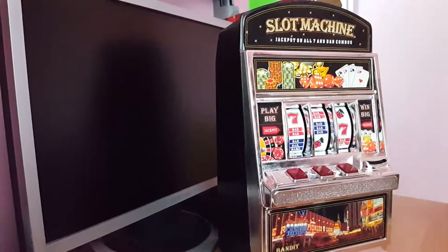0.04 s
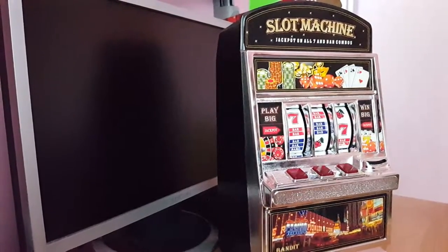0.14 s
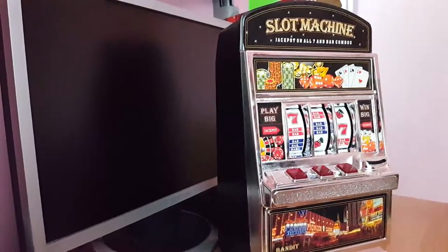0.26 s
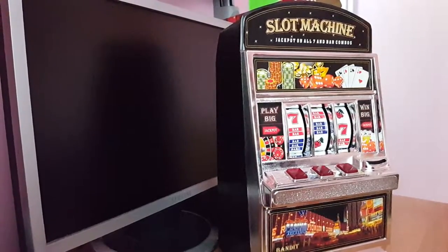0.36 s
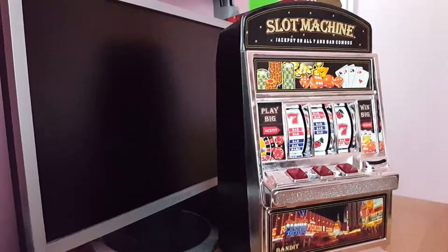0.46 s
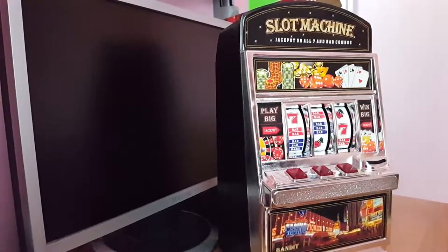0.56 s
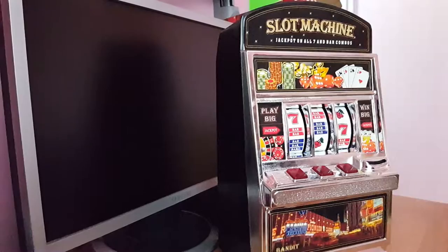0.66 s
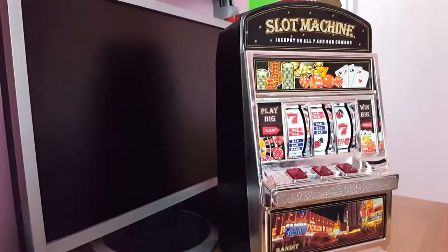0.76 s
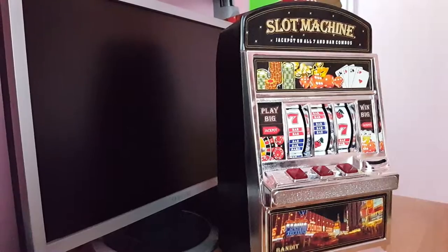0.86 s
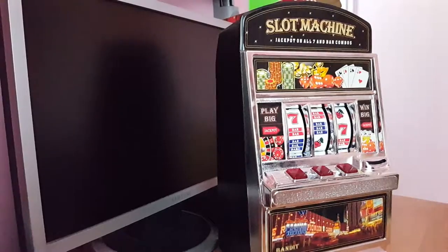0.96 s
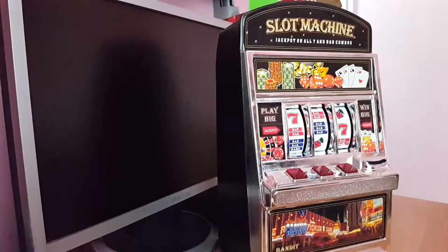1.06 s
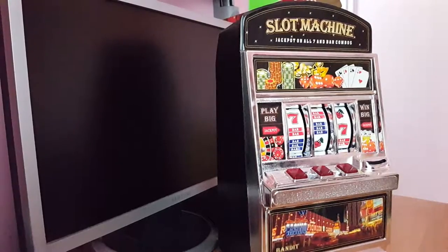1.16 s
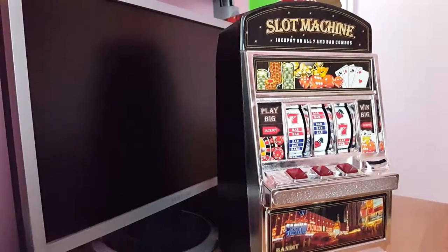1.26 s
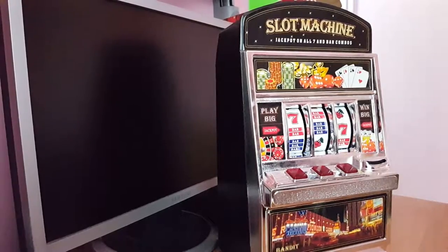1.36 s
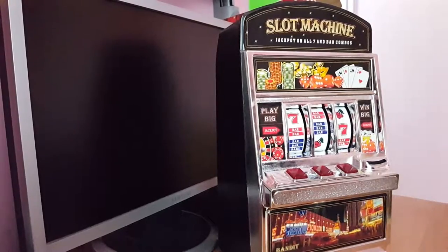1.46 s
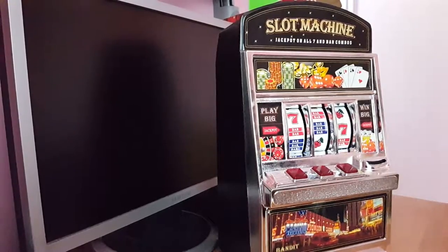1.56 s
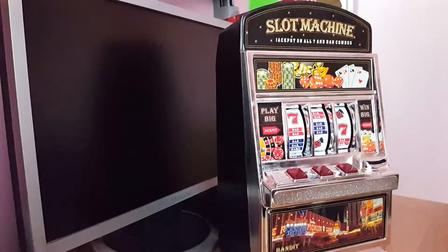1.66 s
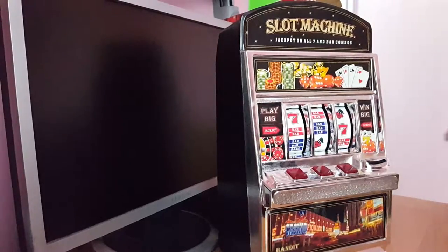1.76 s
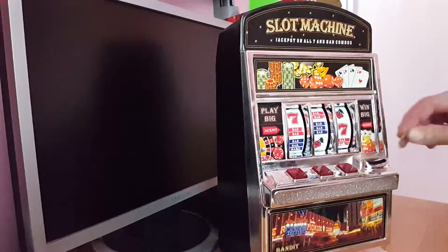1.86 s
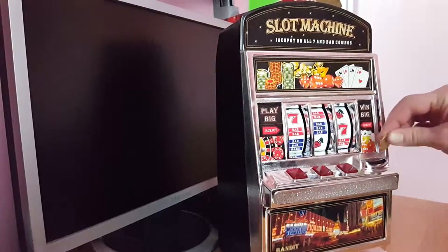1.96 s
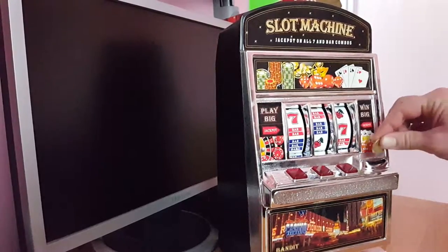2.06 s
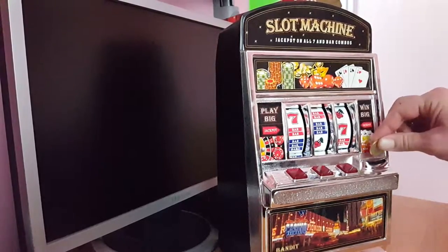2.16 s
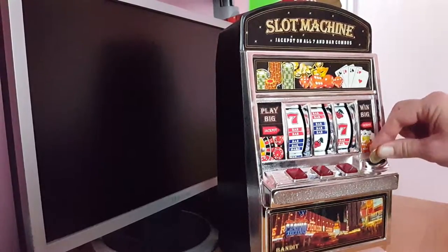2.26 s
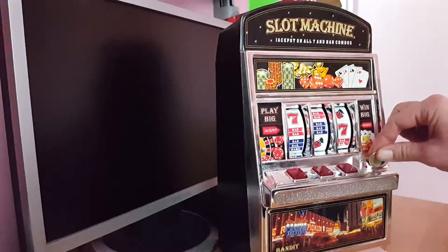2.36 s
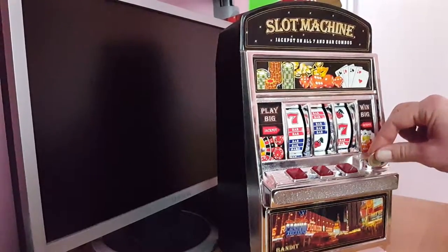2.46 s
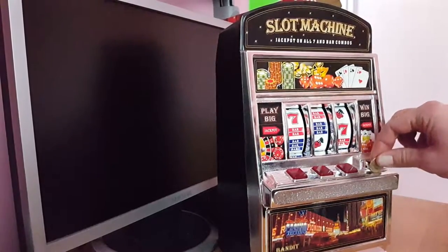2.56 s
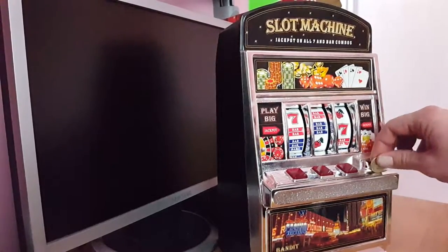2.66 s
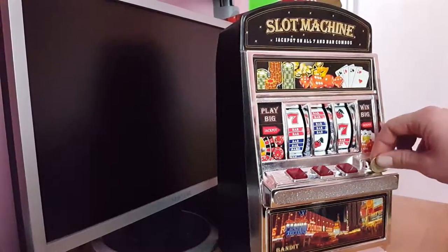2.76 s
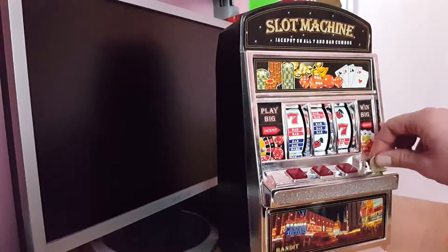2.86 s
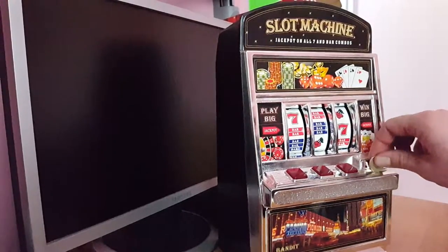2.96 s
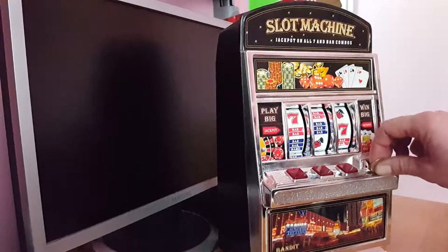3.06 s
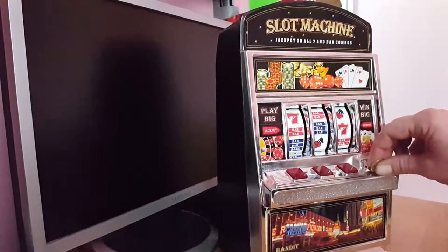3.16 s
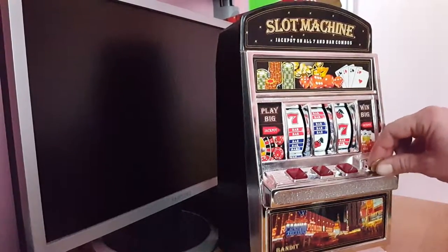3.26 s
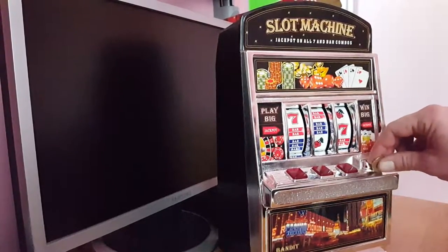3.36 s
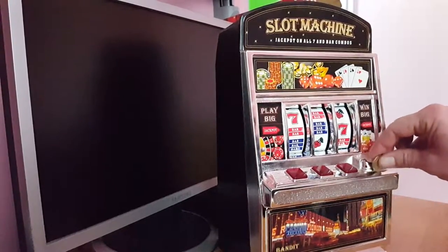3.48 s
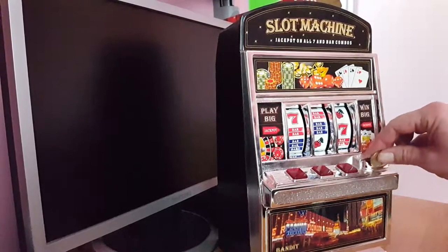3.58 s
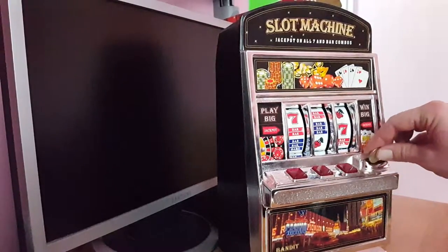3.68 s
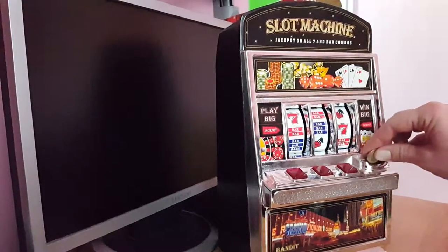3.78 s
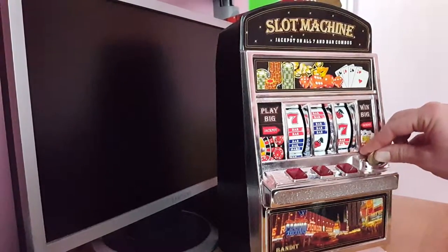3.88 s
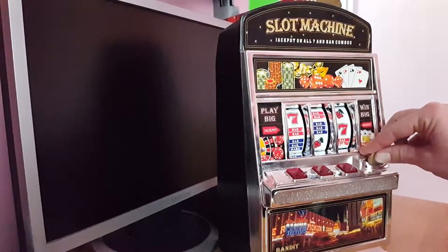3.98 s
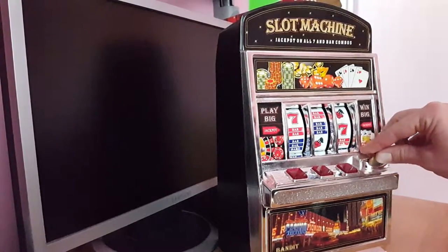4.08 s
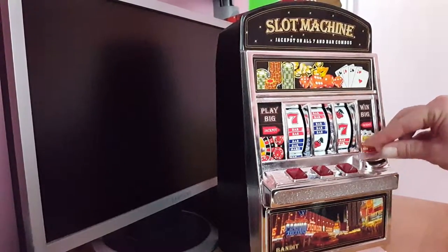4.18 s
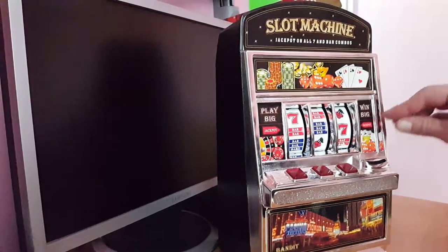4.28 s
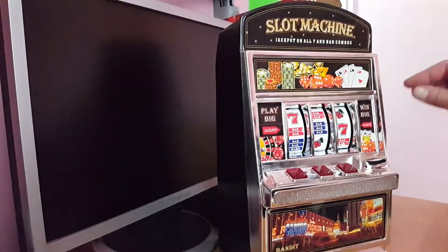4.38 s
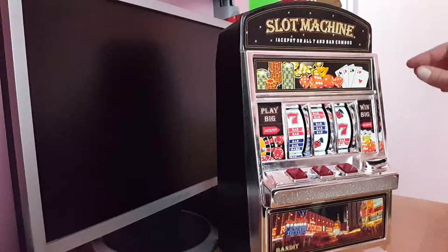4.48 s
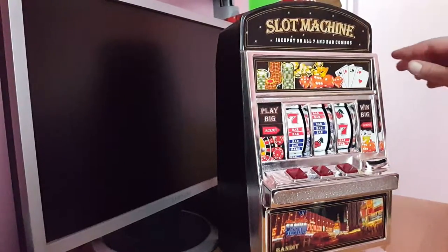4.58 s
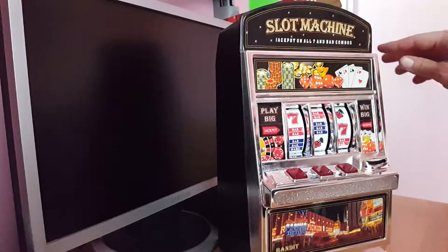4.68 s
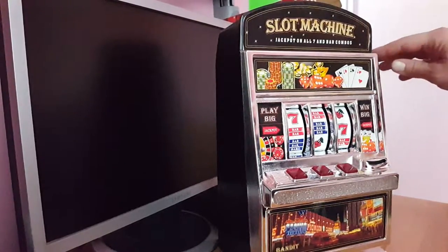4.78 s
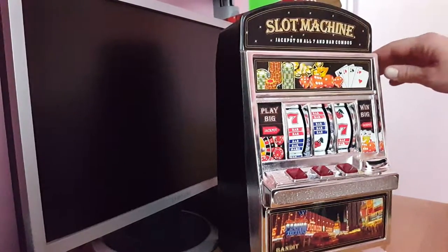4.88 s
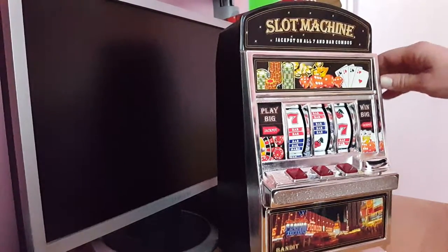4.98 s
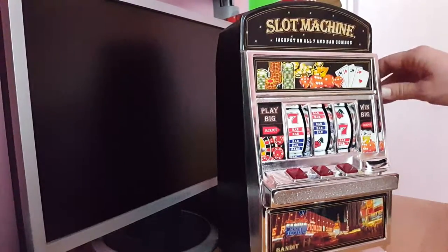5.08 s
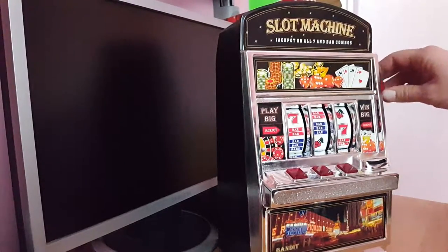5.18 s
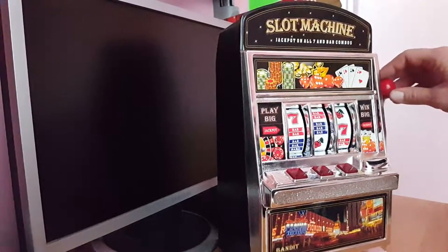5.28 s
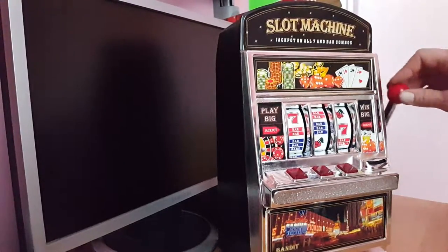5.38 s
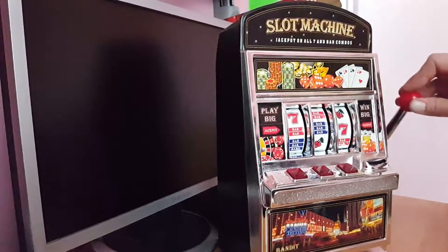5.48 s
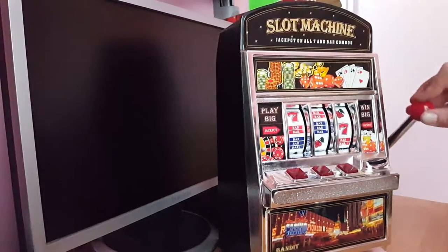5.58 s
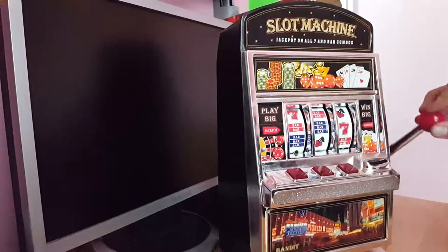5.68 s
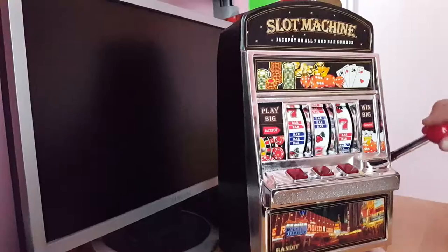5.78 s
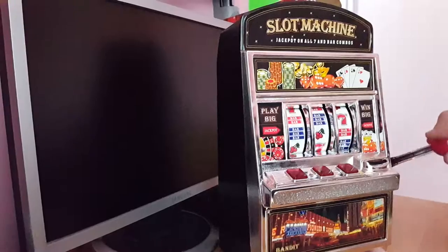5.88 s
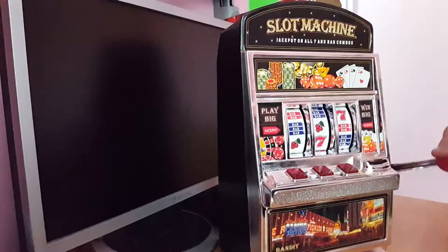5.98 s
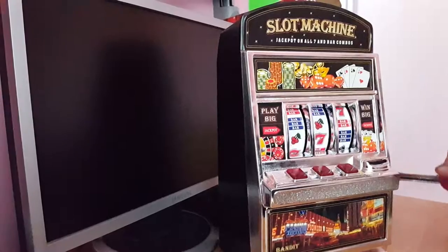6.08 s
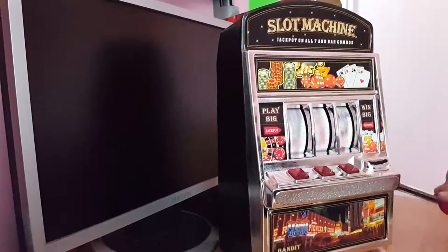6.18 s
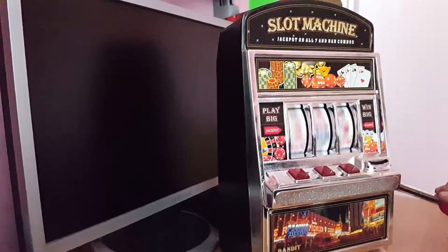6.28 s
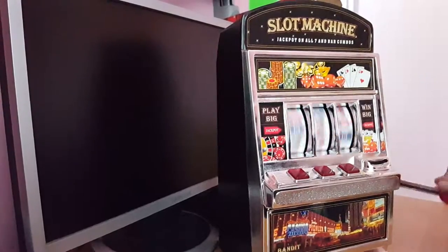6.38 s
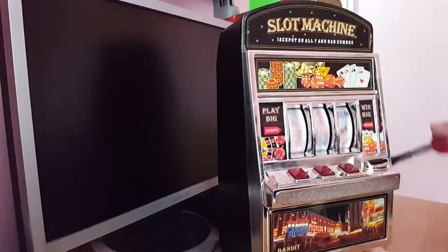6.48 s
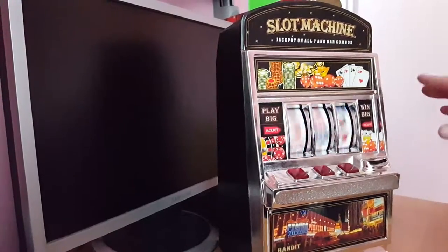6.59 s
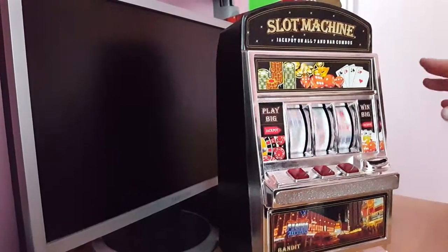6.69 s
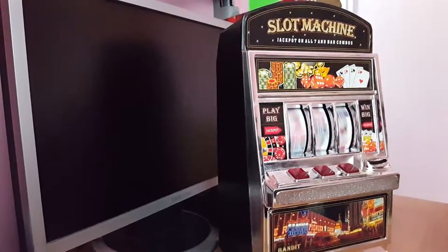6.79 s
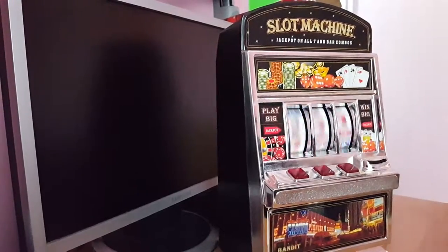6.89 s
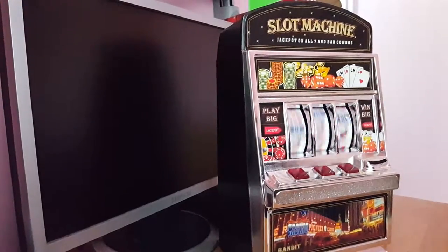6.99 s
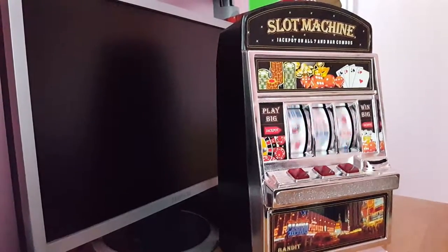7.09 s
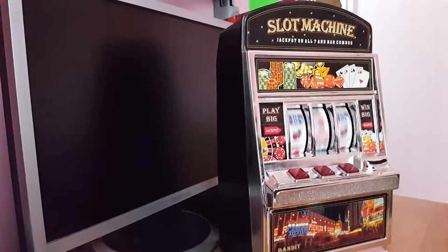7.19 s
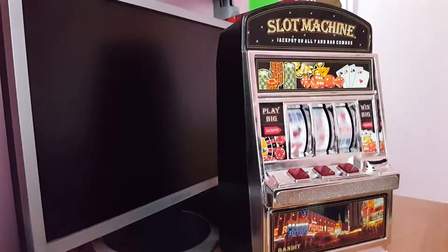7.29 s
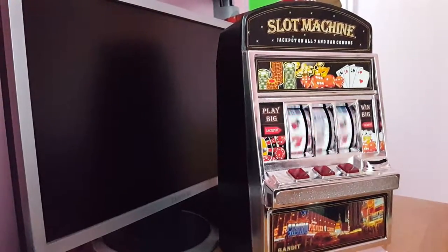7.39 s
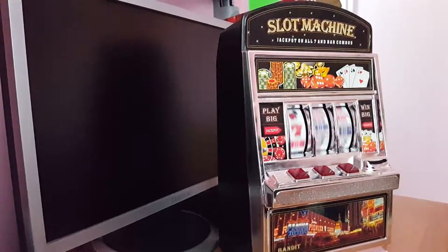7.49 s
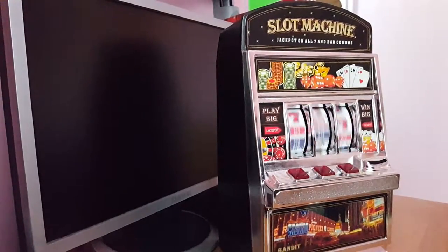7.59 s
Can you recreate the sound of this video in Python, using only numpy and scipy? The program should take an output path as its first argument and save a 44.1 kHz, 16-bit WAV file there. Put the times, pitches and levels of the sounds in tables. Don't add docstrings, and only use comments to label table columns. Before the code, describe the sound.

Close, dry stereo sound of a small plastic toy gambling machine on a desk. First a click, soft touches and one tiny glass clink over faint room hum. A coin knocks around its slot, drops and bounces in a rapid hollow rattle. The lever grinds against its ratchet and snaps back hard; hollow reels whirr, then burst into loud metallic clacking and ease off while still turning.

```python
import sys
import numpy as np
from scipy import signal
from scipy.fft import rfft, irfft, next_fast_len
from scipy.io import wavfile
from scipy.ndimage import uniform_filter1d

SR = 44100
rng = np.random.default_rng(int(sys.argv[2]) if len(sys.argv) > 2 else 0)


def gain_from_db(level_db):
    decades = np.asarray(level_db, float) / 20
    return 10 ** decades


def store_pcm(level_fs):
    pcm = np.round(np.clip(level_fs, -1, 1) * 32767).astype(np.int16)
    wavfile.write(sys.argv[1], SR, np.atleast_2d(pcm).T)


N = 336924

# t/s, force/dB, thud/dB, contact/ms, edge/dB
SLOT_TAPS = [(2.383, -22, -4, 4.7, 4), (2.603, -21, -1.5, 4.7, 1), (2.665, -49.5, -5.5, 6, 3),
             (2.852, -30, -3.5, 5, -4.5), (2.925, -58.5, 12, 8, 0), (3.048, -51.5, 8.5, 17, 0),
             (3.083, -60.5, 13, 8.9, 0), (3.155, -68, 18, 8, 0), (3.19, -68, 18, 6.5, 0),
             (3.316, -54, -9, 6.7, 13), (3.439, -53.5, 13.5, 10, 0), (3.555, -21, -11.5, 6.3, -4),
             (3.608, -24.5, -13.5, 3.9, 0), (4.073, -42, -3.5, 10, -5), (4.12, -32.5, -5, 22, -0.5),
             (5.038, -57.5, 17, 6, 0), (5.247, -40.5, -27, 9.7, 5.5), (5.289, -40.5, 4, 4.5, 3),
             (5.402, -47, 3, 6, 8), (5.449, -54, 3, 9, 18)]
# t/s, force/dB, thud/dB, contact/ms
COIN_BOUNCES = [(4.173, -9.5, -9.5, 8.8), (4.187, -21, 2, 6), (4.217, -14.5, -8.5, 13),
                (4.27, -10, -6, 3.5), (4.287, -12.5, -1, 3.5), (4.298, -18.5, -2.5, 6.4),
                (4.323, -8.5, -20, 9), (4.382, -17, -27.5, 9.9), (4.403, -14, -16, 5.1),
                (4.433, -20, -16, 7.3), (4.457, -12.5, -4, 3.4), (4.487, -15, -17, 11),
                (4.505, -21.5, -1.5, 5.7), (4.526, -42, 4.5, 23), (4.557, -24, -25.5, 10),
                (4.585, -39, -1, 5.4)]
# t/s, force/dB, thud/dB, contact/ms, edge/dB
LEVER_KNOCKS = [(5.518, -40, 3.5, 34, 0), (5.561, -23, -4, 13, -3), (5.579, -25, -15, 3.5, -1.5),
                (5.68, -25.5, -11, 8.4, 0.5), (5.744, -26.5, -2.5, 32, 3), (5.769, -25.5, -2, 3.8, 2),
                (5.816, -32, -14, 5.9, 2), (5.831, -16, -8.5, 21, -3.5), (5.862, -21, 1.5, 15, 2),
                (5.912, -31.5, -10, 3.9, 11), (5.923, -21.5, -7, 28, -3), (5.954, -23.5, -2, 17, 7.5),
                (6.004, -25, -5, 8.1, 11), (6.026, -20.5, -10, 12, 4.5), (6.05, -21.5, -16, 17, 4.5),
                (6.093, -17.5, -18, 8, 1), (6.114, -18, -18, 5, -2), (6.135, -25, 4, 8.8, 5),
                (6.161, -29, -12, 4.6, -4), (6.188, -2.5, -7, 4.9, 0.5), (6.2, -15, 4, 10.4, -2),
                (6.211, -9, -1, 7.7, -1), (6.222, -13, 2.5, 8.5, 3), (6.239, -18.5, 8, 14, 3),
                (6.262, -17, -8, 6.3, -3), (6.609, -11, -11, 7.5, 3), (6.626, -22, -1, 11.6, -3)]
# t/s, force/dB, thud/dB
PAWL_DROPS = [(6.9461, -17.5, -1), (6.9965, -10.5, -9), (7.0758, -5.5, -27), (7.0914, -6.5, -29),
              (7.1167, -6.5, -31), (7.1342, -5, -29), (7.1534, -5.5, -46), (7.2639, -17.5, -10),
              (7.316, -12, -8), (7.3731, -47, -2), (7.444, -14.5, -1.5), (7.5033, -21, 2),
              (7.5632, -17, -3.5), (7.5944, -23.5, 3), (7.6294, -23.5, 1)]
# t/s, force/dB, thud/dB
REEL_WOBBLES = [(6.31, -23, -4), (6.354, -18.5, -10), (6.395, -31, 6), (6.445, -24, -2),
                (6.465, -21.5, -12), (6.536, -24.5, -3), (6.57, -42, -13), (6.681, -20.5, -5),
                (6.755, -30, -14), (6.781, -27.5, -20), (6.83, -32, -7), (6.855, -36, -14),
                (6.921, -25, -3), (7.417, -32, 0)]
# t/s, force/dB, thud/dB
DESK_KNOCKS = [
    (.094, -43, 15),
    (.114, -9, -4),
    (.144, -37, -12),
    (.18, -50, 0),
    (.225, -30.5, -2),
    (.245, -39, 3),
    (.312, -55, 9),
    (.42, -62, 12),
    (.504, -48.5, -8),
    (.586, -44, 2),
]
# t/s, force/dB, thud/dB
DESK_SHUFFLES = [
    (.907, -50.5, -17),
    (.945, -60, 6),
    (.998, -43, 17),
    (1.023, -47, 18),
    (1.04, -45, 13.5),
    (1.07, -43.5, 5.5),
    (1.135, -48, -5),
]
# t/s, force/dB, thud/dB
FINGER_TOUCHES = [(.255, -43, -3), (.42, -50.5, -9), (.505, -52, -9), (.55, -52.5, -12), (.59, -52, -3),
                  (.63, -54, -2), (.65, -58, 5), (.68, -56, -2.5), (.865, -57.5, 7), (.943, -60, 12),
                  (.958, -58, 13), (.975, -61, 12)]
# t/s, force/dB, thud/dB
GLASS_CLINKS = [
    (1.2256, -19.5, -12.5),
    (1.2364, -33, -11),
    (1.257, -40, -9),
    (1.272, -41, -21),
    (1.29, -42, -16.5),
]

# f/Hz, width/Hz, level/dB
CABINET_MODES = [(151.4, 19, 8), (229.6, 9.7, 1), (263, 16, 6), (313.7, 35, 7), (350.8, 18, 10),
                 (437, 81, 0.5), (623.5, 34, -6.5), (679, 98, -8.5), (1085, 96, -4), (1560, 42, -12.5),
                 (1752, 60, -7), (1914, 100, -10.5), (2110, 120, -11), (2502, 430, -13.5), (4400, 400, -28)]
SLOT_MODES = [(290, 31, -11.5), (361, 39, 9), (629, 41, 3), (732, 79, -5.5), (815, 66, -10.5),
              (1030, 85, -4), (1420, 150, -9.5), (1860, 150, -14.5), (2360, 300, -13.5), (2870, 310, -29.5),
              (3970, 160, -17.5), (4830, 400, -22.5), (5650, 510, -32)]
CHUTE_MODES = [(237, 22, -25), (272, 7.6, -8.5), (343, 14, -2.5), (628, 55, 2.5), (1064, 58, 4.5),
               (1158, 81, -7), (1396, 29, -5.5), (1650, 80, -10), (1885, 83, -6), (2290, 170, -9),
               (4040, 100, -10.5), (5630, 220, -24), (6640, 550, -35.5)]
METAL_MODES = [(841, 25, 4), (1054, 42, 6), (1571, 92, 2.5), (1744, 217, 3.5), (2504, 90, -3),
               (2790, 144, 2.5), (3020, 120, -5), (4150, 145, -3), (4550, 180, -24.5), (4750, 230, -4.5),
               (6070, 260, -5), (6900, 230, -20), (7100, 86, -30)]
DESK_MODES = [(132, 6, 0), (262, 25, -3), (520, 50, -7), (610, 40, 5), (720, 60, -3), (1000, 45, -4),
              (1300, 250, -10), (2410, 600, -10), (3700, 1100, -11), (5500, 1200, -11)]
GLASS_MODES = [(600, 60, -10), (950, 90, -10), (1300, 200, -11), (2100, 24, 5), (2240, 45, 1),
               (2620, 150, -5), (2910, 170, -5), (3250, 200, -6), (4300, 300, -8), (5300, 300, -10),
               (6100, 200, -19)]
CLOTH_MODES = [(142, 29, 22.5), (650, 140, 6.5), (1220, 1000, 1.5), (2840, 600, -2.5), (4050, 630, 5),
               (4710, 320, 6.5), (5300, 660, 12)]
# f/Hz, level/dB per Hz
CRACK_COLOUR = [(40, -10.5), (300, -1.5), (1000, -9), (3600, -14.5), (5000, -17.5), (8500, -24.5),
                (10000, -39), (13000, -28), (15800, -39), (16500, -71)]
# f/Hz, level/dB, time to fall 60 dB/s
SPRING_MODES = [(1137, 0, .5), (1800, -9, .15), (2330, -7, .12), (2815, -8, .5), (3235, -6, .18),
                (3779, -8, .3), (4032, -4, .4), (4250, -7, .15), (4480, -6, .2), (5000, -9, .15)]

# t/s, level/dB
REEL_EFFORT = [
    (6.19, -24),
    (6.286, -30.5),
    (6.432, -32),
    (6.666, -39),
    (6.912, -31),
    (7.16, -27.5),
    (7.308, -31),
    (7.482, -35.5),
    (7.64, -38.5),
]
CHATTER_EFFORT = [
    (6.25, -39),
    (6.6, -45),
    (6.88, -44),
    (6.97, -40.5),
    (7.0, -16.5),
    (7.09, -16),
    (7.158, -30.5),
    (7.192, -22),
    (7.3, -39.5),
]
SCRAPE_EFFORT = [
    (.07, -82),
    (.106, -50),
    (.112, -42),
    (.125, -66),
    (.165, -46.5),
    (.341, -67.5),
    (.495, -76),
    (.639, -64.5),
    (.75, -80),
]
TUMBLE_EFFORT = [
    (4.16, -46),
    (4.33, -36.5),
    (4.37, -40.5),
    (4.448, -31),
    (4.52, -31.5),
    (4.62, -49.5),
]
PULL_EFFORT = [
    (5.69, -44),
    (5.8, -41),
    (5.89, -31),
    (6.1, -27),
    (6.14, -29),
    (6.178, -56),
]
# t/s, level/dB
GRIP_EFFORT = [
    [(5.22, -64), (5.36, -61.5)],
    [(5.51, -81), (5.58, -37.5), (5.66, -91)],
]
# t/s, level/dB
RUSTLE_EFFORT = [
    [(.89, -60), (.93, -59.5), (.975, -63), (1.01, -54), (1.08, -55.5), (1.135, -41.5), (1.185, -81),
     (1.222, -42)],
    [(2.25, -80.5), (2.27, -74), (2.37, -82.5)],
    [(3.525, -84), (3.553, -47)],
    [(4.122, -56), (4.145, -46), (4.168, -82)],
]
# t/s, level/dB
BOOM_LEVEL = [(5.7, -46), (6.098, -48), (6.19, -48), (6.56, -50.5), (7.034, -31.5), (7.11, -20),
              (7.145, -20.5), (7.19, -15.5), (7.23, -24), (7.265, -39), (7.331, -19.5), (7.37, -40),
              (7.64, -56)]
# t/s, level/dB
RUMBLE_LEVEL = [(.1, -68), (.13, -61), (.23, -66), (.28, -65.5), (.32, -52), (.43, -57), (.46, -70),
                (.78, -73.5), (.84, -56.5), (.9, -65), (1.1, -69), (1.16, -59), (1.2, -59), (1.3, -68),
                (4.999, -79), (5.06, -57), (5.14, -58), (5.2, -74)]

HUM_COLOUR = [(12, -56.5), (30, -28.5), (55, -3), (91, -25), (138, -3.5), (163, -28.5), (204, -5.5),
              (434, -18), (1260, -23), (1610, -24.5), (2670, -29.5), (16000, -47.5)]
WHINE_TONES = [(1361, -70.5), (2722, -81.5), (489, -78.5), (131, -69.5)]
HUM_LIKENESS = [(60, -0.38), (240, -0.68), (950, -0.41), (3770, -0.025), (15000, -1.1)]
PORT_LEAN = [(60, 1.5), (300, 2.5), (1000, 2), (3000, 1.5), (6000, -1), (9000, 13.5), (12000, 2),
             (15000, 10.5)]
ROOM_DECAY = [(150, 0.69), (500, 0.26), (2000, 0.26), (6000, 0.2), (14000, 0.044)]
ROOM_LIKENESS = [(100, 1), (300, .95), (700, 1), (2000, 0), (8000, 0.3)]
PORT_APART = [0.6, 0.22, 0.95]

# edge under the force/dB, edge lost per dB of thud/dB, usual contact/ms
TOUCH = dict(taps=(-17, .05, 5.4), coin=(-17.5, 0.39, 6), lever=(-9.5, 0.22, 8), pawl=(-18.5, 0.14, 7.9),
         nearby=(-1.1, 0.062, 7.5), fidget=(-9, .1, 9.1), wobble=(-16, 0.18, 10),
         clink=(-18.5, 0.041, 1.76))
# (low/dB, high/dB) at firm effort, (low, high)/dB per dB
FOLLOW = dict(tumble=((-8, -10), (0.4, 1)), gears=((-.6, -13), (.65, 4)), reels=((-.6, -12), (.65, 0.6)),
          chatter=((-3, -10), (0.78, 0.86)), scrape=((-5, 14), (0.8, 1.9)), rustle=((-13, -7), (0.8, 1)))

FIRM_DB = -30
EDGE_HZ = 16100
DESK_CRACK_DB = -15


def evened(x):
    return x / np.sqrt(np.mean(x ** 2) + 1e-20)


def read(points, hz):
    f, value = np.transpose(points)
    return np.interp(np.log(hz + 1), np.log(f + 1), value)


def add(mix, s, sound):
    part = mix[:, round(s * SR):][:, :sound.shape[1]]
    part += sound[:, :part.shape[1]]


def hum(loud):
    frames, hz, t = N // 512 + 5, np.fft.rfftfreq(2048, 1 / SR), np.arange(N) / SR
    a, b, c, d, patches = rng.standard_normal((frames, 1025, 5)).T
    patches = evened(uniform_filter1d(uniform_filter1d(patches, 14, 0), 8, 1))
    same = np.clip(read(HUM_LIKENESS, hz), -1, 1)[:, None]
    left = a + 1j * b
    right = same * left + np.sqrt(1 - same ** 2) * (c + 1j * d)
    z = np.array([left, right]) * gain_from_db(read(HUM_COLOUR, hz)[:, None] + 1.4 * patches)
    air = gain_from_db(-61.5) * evened(signal.istft(z, nperseg=2048, noverlap=1536)[1][:, :N])
    wavers = evened(uniform_filter1d(rng.standard_normal((len(WHINE_TONES), N)), 6000, axis=1))
    tones = np.zeros(N)
    for (f, db), waver in zip(WHINE_TONES, wavers):
        level_db = db + (1.75 + 400 / f) * waver - 300 / f
        tones += gain_from_db(level_db) * np.sqrt(2) * np.sin(2 * np.pi * f * t)
    power = signal.lfilter([1 / 1200], [1, 1 / 1200 - 1], loud[0] ** 2)
    loud_db = 10 * np.log10(power + 1e-12)
    push_down = gain_from_db(.8 * np.maximum(loud_db + 38.5, 0))
    return air * gain_from_db([[.8], [-.8]]) + tones * gain_from_db([[1.], [-1.]]) / push_down


def rumble():
    centre_hz, width_hz = 120., 89.9
    edges = [max(centre_hz - width_hz, 25), centre_hz + width_hz]
    band = signal.butter(2, edges, "band", fs=SR, output="sos")
    level_db = np.interp(np.arange(N) / SR, *np.transpose(RUMBLE_LEVEL), -200, -200)
    low = evened(signal.sosfilt(band, rng.standard_normal(N)))
    return low * gain_from_db(level_db + np.array([[1.], [-1.]]))


def room(x):
    taps = np.zeros((2, SR // 2))
    at = np.arange(160, SR // 2 - 20, 20)
    at = at + rng.integers(0, 20, (2, len(at)))
    np.put_along_axis(taps, at, rng.choice([-1., 1.], at.shape), 1)
    hz, t, z = signal.stft(taps, SR, nperseg=256)
    z = z * gain_from_db(-60 * t / read(ROOM_DECAY, hz)[:, None])
    z /= np.sqrt((abs(z) ** 2).sum(2, keepdims=True))
    same = np.clip(read(ROOM_LIKENESS, hz), 0, 1)[:, None]
    z[1] = same * z[0] + np.sqrt(1 - same ** 2) * z[1]
    tail = signal.istft(z, SR, nperseg=256)[1]
    tail[:, :160] = 0
    return signal.fftconvolve(x, tail / np.linalg.norm(tail[0]), axes=1)[:, :N]


def ports(x):
    lag = 2.57
    size = next_fast_len(N + 512)
    hz = np.fft.rfftfreq(size, 1 / SR)
    lean = gain_from_db(read(PORT_LEAN, hz) / 2)
    left = lean * np.exp(-2j * np.pi * hz * lag / SR)
    return irfft(rfft(x, size) * np.array([left, 1 / lean]), size)[:, :N]


def causal(db):
    log = np.log(gain_from_db(np.maximum(np.r_[db, db[-2:0:-1]], -100)))
    return np.fft.ifft(np.exp(log - 1j * signal.hilbert(log).imag)).real[:len(db)]


def body(modes, low_hz, high_hz, crack_db, spot_db):
    t, grid = np.arange(4096) / SR, np.fft.rfftfreq(8192, 1 / SR)
    hz, width, db = np.transpose(modes)[:, :, None]
    weight, shift = rng.standard_normal((2,) + db.shape)
    db = db + min(spot_db, 3.) * weight
    hz = hz + .35 * np.minimum(width, 120) * shift
    fade = np.exp(-np.pi * width * t)
    ring = (gain_from_db(db) * 2 * np.pi * width / SR * fade * np.sin(2 * np.pi * hz * t)).sum(0)
    whole = ring + gain_from_db(crack_db) * causal(read(CRACK_COLOUR, grid))[:len(t)]
    small = signal.butter(4, .75 * hz.min(), "high", fs=SR, output="sos")
    whole = signal.sosfilt(small, whole)
    parts = []
    for edge, kind in (([low_hz, high_hz], "band"), (low_hz, "low"), (high_hz, "high")):
        parts.append(signal.sosfilt(signal.butter(3, edge, kind, fs=SR, output="sos"), whole))
    parts = np.array(parts)
    return parts / np.linalg.norm(parts, axis=1)[:, None]


def flurry(ms, t):
    fade = np.exp(-t * 1000 / max(ms, .2)) * np.minimum(t / 0.0015, 1)
    grit = rng.standard_normal((2, len(t)))
    z = rfft(grit * abs(grit) * fade)
    broad = np.sqrt(uniform_filter1d(abs(z) ** 2, 7, axis=1))
    return evened(irfft(z / broad, len(t)) * fade ** .2)


def blows(rows, touch, modes, low_hz, high_hz, crack_db, spot_db, trim_db, pan_db=0.):
    out, t = np.zeros((2, N)), np.arange(2400) / SR
    apart = np.clip(PORT_APART, 0, 1)[:, None]
    edge_db, dulling, usual_ms = TOUCH[touch]
    for s, force_db, thud_db, *more in rows:
        ms, sharp_db = more + [usual_ms, 0][len(more):]
        softness = 0.16 * (force_db - FIRM_DB)
        high_db = edge_db + sharp_db - dulling * thud_db + softness
        dbs = force_db + np.array([0, thud_db, high_db])
        parts = body(modes, low_hz, high_hz, crack_db, spot_db)
        left, other = signal.fftconvolve(flurry(ms, t)[:, None], parts[None], axes=2)
        peak = np.sqrt(uniform_filter1d(left ** 2, 200, axis=1).max(1))
        right = np.sqrt(1 - apart ** 2) * left + apart * other
        add(out, s, (gain_from_db(dbs) / peak) @ np.array([left, right]))
    return gain_from_db(trim_db + np.array([[pan_db], [-pan_db]])) * out


def rattle(tables, follow, modes, low_hz, high_hz, crack_db, per_s, spread_db, same,
           blunt_hz=EDGE_HZ, count=3):
    return rattle_mixed([(rows, follow) for rows in tables], modes, low_hz, high_hz, crack_db,
                        per_s, spread_db, same, blunt_hz, count)


def rattle_mixed(spans, modes, low_hz, high_hz, crack_db, per_s, spread_db, same, blunt_hz, count):
    t, level, out = np.arange(N) / SR, np.zeros((3, N)), np.zeros((2, N))
    for rows, follow in spans:
        firm_db, slope = FOLLOW[follow]
        effort = np.interp(t, *np.transpose(rows), -400, -400) - FIRM_DB
        level += gain_from_db(FIRM_DB + np.r_[0, firm_db][:, None] + np.r_[1, slope][:, None] * effort)
    first = np.argmax(level[0] > 1e-8)
    last = N - np.argmax(level[0, ::-1] > 1e-8)
    for spot in range(count):
        size, sign, chance = rng.random((3, 2, last - first))
        knocks = gain_from_db(spread_db * np.minimum(-np.log(size), 4)) * np.sign(sign - .5)
        knocks = evened(knocks * (chance < per_s / count / SR)) / np.sqrt(count)
        gusts = evened(uniform_filter1d(rng.standard_normal(last - first), round(SR / 25. / 2)))
        knocks *= evened(gain_from_db(3. * uniform_filter1d(gusts, 200)))
        knocks[1] = same * knocks[0] + np.sqrt(1 - same ** 2) * knocks[1]
        parts = body(modes, low_hz, high_hz, crack_db, 2.6)
        parts = signal.sosfilt(signal.butter(1, blunt_hz, fs=SR, output="sos"), parts)
        shaken = knocks * level[:, None, first:last]
        add(out, first / SR, signal.oaconvolve(shaken, parts[:, None], axes=2).sum(0))
    return out


def fingers():
    return blows(FINGER_TOUCHES, "fidget", DESK_MODES[2:], 830, 1160, -26.5, 1.5, -7.5)


def rustle():
    return rattle(RUSTLE_EFFORT, "rustle", CLOTH_MODES, 800, 3500, -5, 2500, 3., .7, count=1)


def desk_knocks():
    knocks = blows(DESK_KNOCKS, "nearby", DESK_MODES, 1100, 2670, DESK_CRACK_DB, 1.5, -12.5, -0.12)
    return knocks + blows(DESK_SHUFFLES, "nearby", DESK_MODES[1:], 1030, 3200, DESK_CRACK_DB, 2.7, -10.5, -0.1)


def scrape():
    return rattle([SCRAPE_EFFORT], "scrape", DESK_MODES, 1200, 3500, DESK_CRACK_DB, 1500, 6.8, 0.93, count=1)


def clink():
    return blows(GLASS_CLINKS, "clink", GLASS_MODES, 1500, 3500, -15, .6, -6., .4)


def slot_taps():
    return blows(SLOT_TAPS, "taps", SLOT_MODES, 630, 3000, -6.0, 1.0, -7.0, 0.19)


def coin():
    return blows(COIN_BOUNCES, "coin", CHUTE_MODES, 860, 3500, 0.4, 2.2, -3.5, 0.11)


def gears():
    spans = [(TUMBLE_EFFORT, "tumble")] + [(rows, "gears") for rows in GRIP_EFFORT + [PULL_EFFORT]]
    return rattle_mixed(spans, CABINET_MODES, 740, 3500, -9.5, 700, 2.04, 0.9, EDGE_HZ, 4)


def spring():
    t, out = np.arange(2900) / SR, np.zeros((2, N))
    twang = np.zeros(len(t))
    for hz, db, t60 in SPRING_MODES:
        twin = 1 + (hz > 1500) * .6 * np.sin(2 * np.pi * .012 * hz * t)
        twang += gain_from_db(db - 60 * t / t60) * np.sin(2 * np.pi * hz * t) * twin
    add(out, 5.681, gain_from_db(-31) * np.ones((2, 1)) * twang * signal.windows.tukey(len(t), .2))
    return out


def lever():
    return blows(LEVER_KNOCKS, "lever", CABINET_MODES, 840, 3180, 0.9, 2.7, -5.0, 0.13)


def pawl():
    return blows(PAWL_DROPS, "pawl", METAL_MODES, 2220, 4680, -1.2, 3.9, -7.0, 0.11)


def boom():
    hz, width_hz, beat_hz = 313.4, 13.7, 42.
    t, r = np.arange(N) / SR, np.exp(-np.pi * width_hz / SR)
    turn = np.exp(2j * np.pi * hz * t)
    slow = signal.lfilter([1], [1, -2 * r, r ** 2], rng.standard_normal(N) / turn)
    steadied = slow / (abs(slow) + 2.2 * abs(slow).mean())
    beat = 1 + gain_from_db(-9.5) * np.exp(2j * np.pi * beat_hz * t)
    level_db = np.interp(t, *np.transpose(BOOM_LEVEL), -200, -200) - 3.5
    return evened((steadied * turn * beat).real) * gain_from_db(level_db)


def reels():
    whirr = rattle([REEL_EFFORT], "reels", CABINET_MODES, 740, 3500, -9.5, 700, 2.04, 0.9, 5700, count=4)
    wobble = blows(REEL_WOBBLES, "wobble", CABINET_MODES, 930, 2300, -6.0, 3.6, -5.5, 0.1)
    chatter = rattle([CHATTER_EFFORT], "chatter", METAL_MODES, 2220, 4300, 0, 1800, 3.4, 0.13)
    return whirr + wobble + chatter


def scene():
    taps, bounces = slot_taps(), coin()
    around = desk_knocks() + scrape() + clink() + rustle()
    machine = gears() + spring() + lever() + pawl() + reels()
    direct = around + machine
    echo = gain_from_db(-3) * room(direct + gain_from_db(-3.0) * taps + gain_from_db(-4) * bounces)
    heard = ports(taps + bounces + direct + boom() + echo)
    return heard + hum(heard) + rumble() + ports(fingers())


def low_pass(x):
    return signal.sosfilt(signal.butter(12, 16810, fs=SR, output="sos"), x)


def record(dry):
    hiss = gain_from_db(-80) * np.diff(rng.standard_normal(dry.shape), prepend=0)
    noisy = dry + hiss
    knee = np.clip(noisy, -.55, .55)
    limited = knee + .25 * np.tanh((noisy - knee) / .25)
    mix = signal.oaconvolve(limited, signal.firwin(191, EDGE_HZ, fs=SR)[None], "same")
    return low_pass(mix)


dry = scene()
out = record(dry)
store_pcm(out)
```